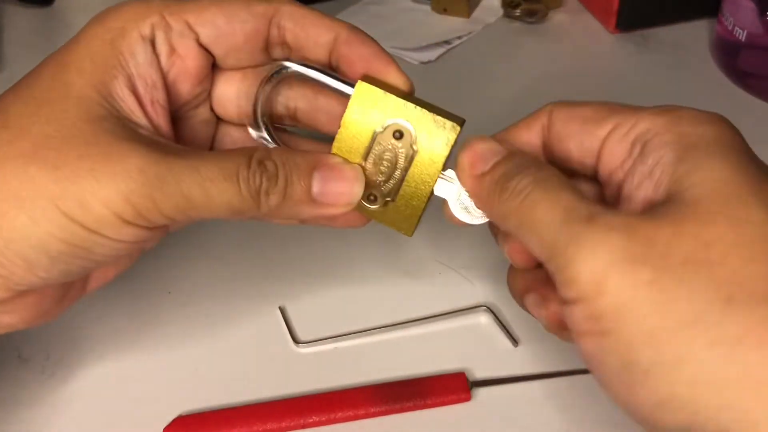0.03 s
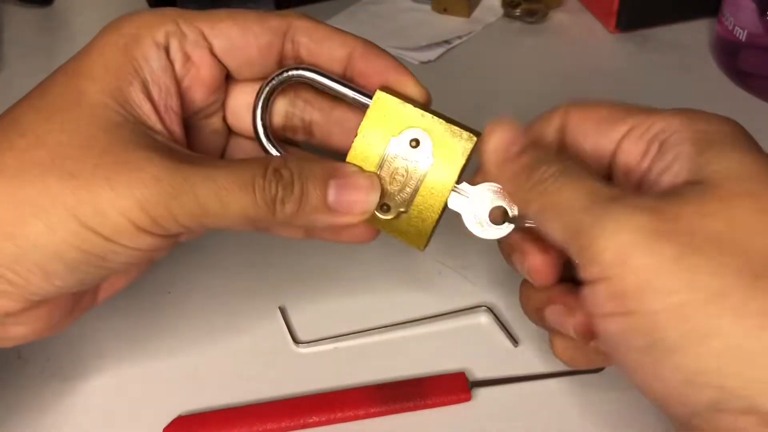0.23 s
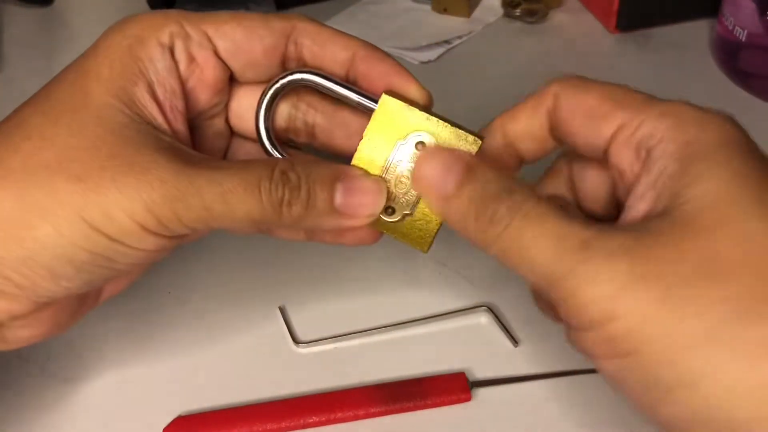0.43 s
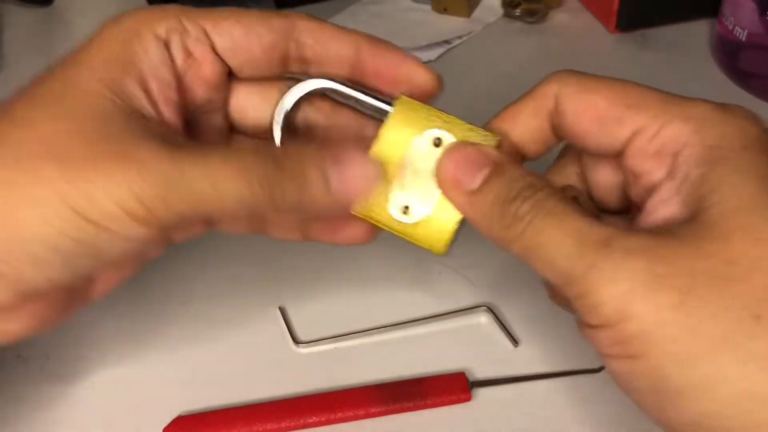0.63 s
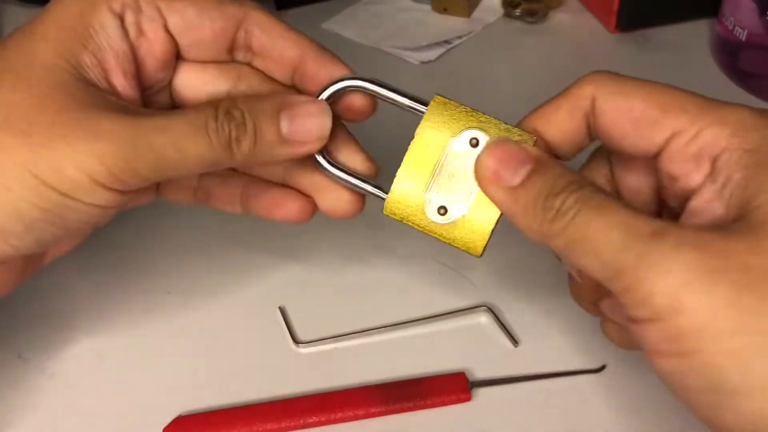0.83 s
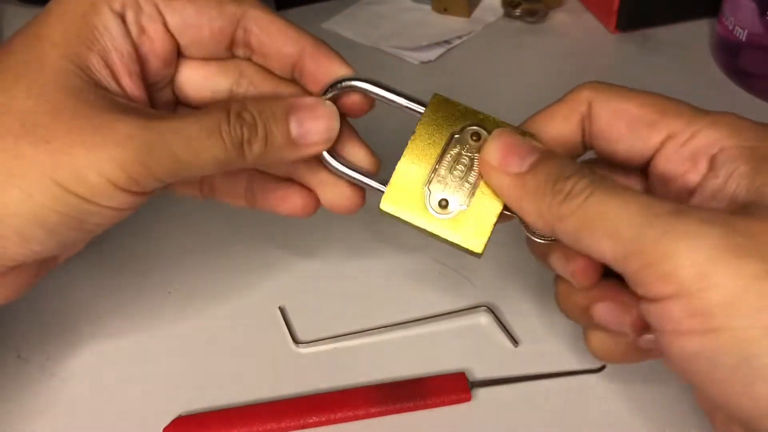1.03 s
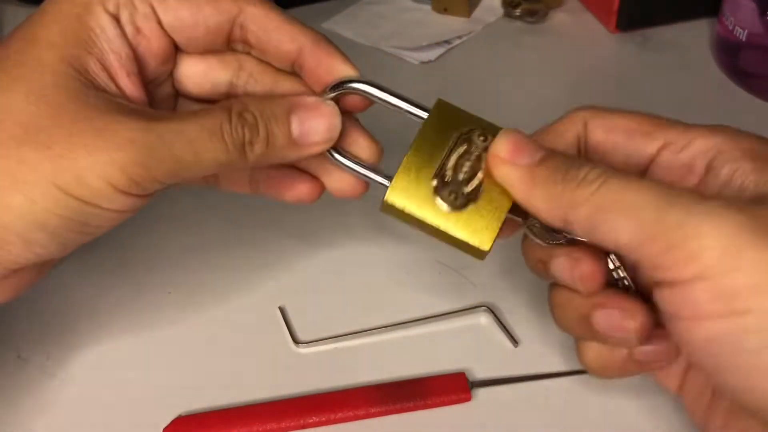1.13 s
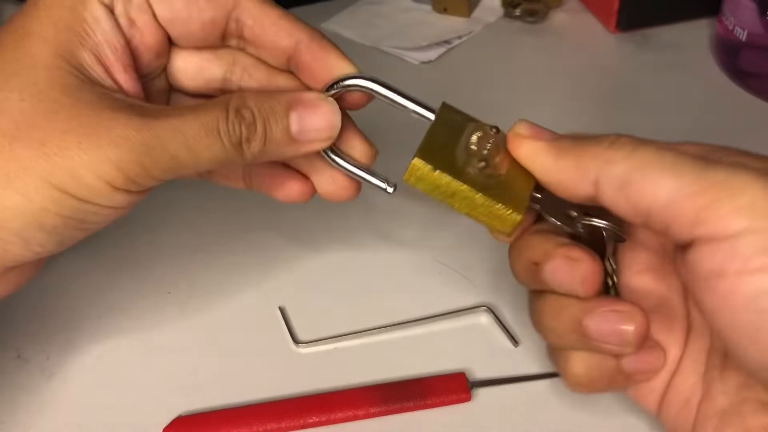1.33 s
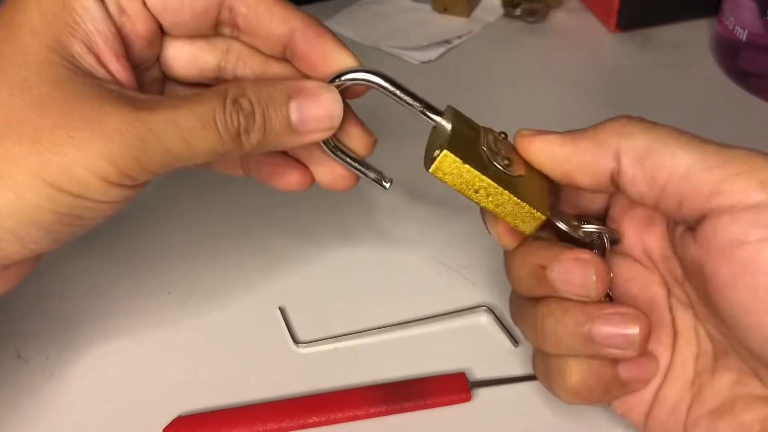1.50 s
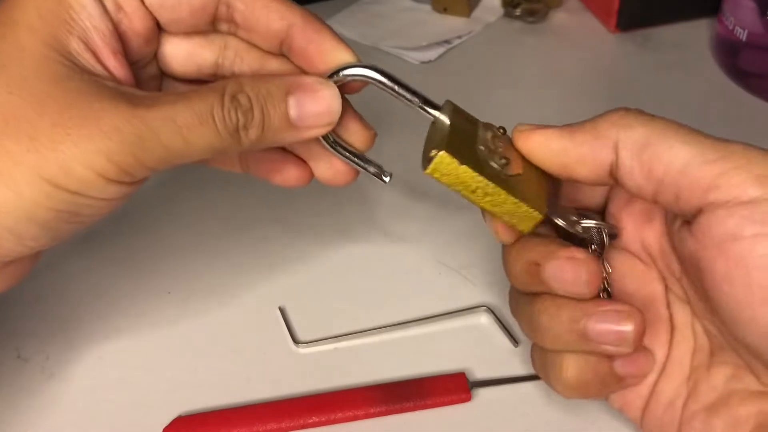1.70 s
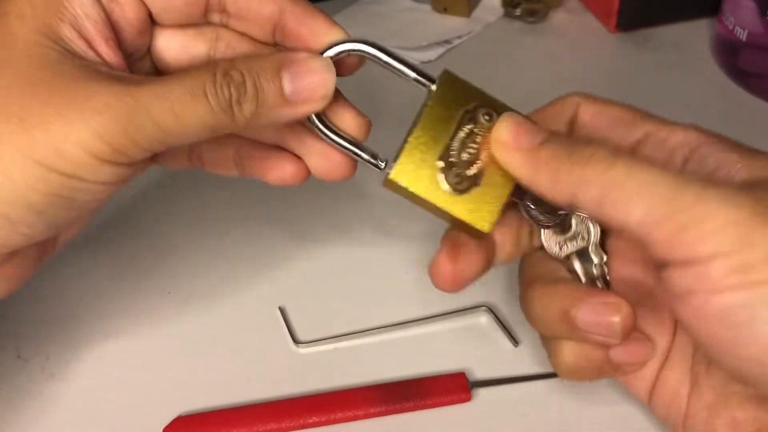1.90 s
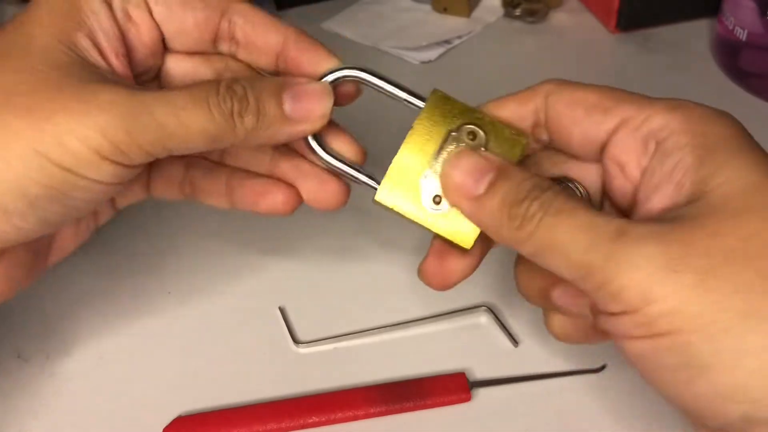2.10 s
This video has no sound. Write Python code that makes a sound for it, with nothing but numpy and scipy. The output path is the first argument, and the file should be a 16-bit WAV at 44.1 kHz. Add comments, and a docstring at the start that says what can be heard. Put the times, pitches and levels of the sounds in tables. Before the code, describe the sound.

A small padlock snaps sharply at 0.06 seconds, a very bright, dense metallic crack with a short diffuse echo. Light ticks and a faint scrape follow at 0.26, then near quiet until a crisp click at 1.0 and a smaller one at 1.2. A soft low bump comes at 1.36. From 1.76 to 2.1, delicate key ticks and scrapes cluster. Low ventilation rumble and faint hiss run throughout.

```python
"""A small brass padlock and its key, worked by hand close to a phone in a quiet room.
The latch snaps home in a rattle of hard blows; key and shackle tick and scrape before and after it.
Contacts crack and ring the metal's modes, and grains of friction drive the same modes in scrapes.
The room answers with a short diffuse echo, over ventilation rumble, low resonances, hiss, a faint
whine and one soft bump. The phone's limiter ducks everything during the snap."""
import sys
import numpy as np
from scipy import signal
from scipy.fft import rfft, irfft
from scipy.io import wavfile
from scipy.ndimage import uniform_filter1d, minimum_filter1d

SR = 44100
rng = np.random.default_rng(int(sys.argv[2]) if len(sys.argv) > 2 else 0)


def gain_from_db(level_db):
    """Convert decibel levels to linear amplitude factors (20 dB per decade)."""
    decades = np.asarray(level_db, float) / 20
    return 10 ** decades


def dump_mix(stems):
    """Bounce the given channels to the path in sys.argv[1] as a 16-bit WAV at rate SR."""
    frames = np.atleast_2d(stems).T  # one column per channel
    limited = np.clip(frames, -1, 1)  # hard clip at full scale
    pcm = np.round(limited * 32767).astype(np.int16)
    wavfile.write(sys.argv[1], SR, pcm)


N = 94815  # samples

# modes of the hand-held lock and key: f/Hz, relative level/dB, t60/s
LOCK = [(2334.4, -5.5, 0.01), (3000, -1, 0.016), (3463, 5.5, 0.011), (4300, 5, .012), (4760, -3, 0.014),
        (4920, 0, 0.011), (5780, 2, 0.01), (6100, -1, .007), (6750, -4.5, 0.009), (7550, -3, 0.007),
        (8420, -3, 0.0067), (9060, -1.5, 0.012), (9718, -5, 0.00792), (10400, -5.5, .008),
        (11220, -2, 0.00767), (12250, -6, 0.013), (12800, 4.5, 0.01), (12830, -26, .06), (13800, -6, .009),
        (15070, -2, .009), (15590, -2, 0.011053)]


def shaped(gain):
    """Noise of rms 1 with gain(Hz) as its amplitude spectrum."""
    spectrum = rfft(rng.standard_normal(N)) * gain(np.fft.rfftfreq(N, 1 / SR) + 1)
    x = irfft(spectrum, N)
    return x / x.std()


def walk(rate):
    """Slow random curve about zero, spread near 1, from `rate` random values a second."""
    k = int(SR / rate)
    steps = np.repeat(rng.standard_normal(N // k + 1), k)
    return 1.3 * uniform_filter1d(uniform_filter1d(steps, k), k)[:N]


def air():
    """Ventilation rumble, wavering low resonances of the room air, microphone hiss, a faint high whine."""
    # spectrum of the rumble: f/Hz, relative level/dB
    rumble_spectrum = [(15, -60), (25, -43), (39, -30.5), (53, -1), (84, -14), (120, -2), (180, 4.5),
                       (242, -6), (277, -0.5), (545, -12), (591, -10), (754, -11), (1160, -13), (1370, -14),
                       (4740, -34.5), (16000, -61)]
    # resonances of the room air: f/Hz, full width at half amplitude/Hz, rms level before waver/dB
    resonances = [(58.5, 17, -72), (138, 21.4, -62), (203.4, 31, -68), (299, 12.92, -67),
                  (396.36, 11, -65.5), (601.3, 11, -63.5), (1053, 190, -65.5)]
    rumble_db, waver_db, hiss_db = -47, 0.6, -76.5
    whine_hz, whine_db, whine_waver_db = 14560, -87, 1.5

    hz, db = np.array(rumble_spectrum).T
    out = gain_from_db(rumble_db) * shaped(lambda f: gain_from_db(np.interp(np.log(f), np.log(hz), db)))
    for centre, width, level_db in resonances:
        level = gain_from_db(level_db + waver_db * walk(5.22))
        out = out + level * shaped(lambda f: 1 / (1 + (2 * (f - centre) / width) ** 2))
    hiss = gain_from_db(hiss_db) * rng.standard_normal(N)
    whine = np.sin(2 * np.pi * whine_hz * np.arange(N) / SR)
    return out + hiss + gain_from_db(whine_db + whine_waver_db * walk(38.3)) * whine


def reach(hz, centre_hz, octaves):
    """How strongly a contact bright at centre_hz stirs each pitch: a bell curve in octaves."""
    return np.exp(-.5 * (np.log2(hz / centre_hz) / np.clip(octaves, .08, 3)) ** 2)


def contacts(rows, modes, spike=0):
    """Each contact cracks and rings the modes near its brightest pitch, at random strengths."""
    scatter_db, detune = 2, 0.9  # spread of mode level; spread of pitch in Hz x t60
    crack_level, crack_s = 0.5, 0.001  # starting rms beside the ring; decay
    rise_s = 0.00013
    length = 9000  # samples
    t = np.arange(length) / SR
    hz, db, t60 = np.array(modes).T
    out = np.zeros(N + length)
    chance = rng.standard_normal((len(rows), 3, 256))
    for (s, peak_db, centre_hz, octaves), (a, b, c) in zip(rows, chance):
        strength = gain_from_db(db + scatter_db * a[:len(hz)]) * reach(hz, centre_hz, octaves)
        pitch = hz + detune * b[:len(hz)] / t60  # short modes scatter most
        rings = np.sin(2 * np.pi * pitch[:, None] * t) * 1000. ** (-t / t60[:, None])
        y = strength @ rings / np.sqrt(np.sum(strength ** 2))

        colour = reach(np.fft.rfftfreq(len(c), 1 / SR) + 1, centre_hz, octaves)
        crack = irfft(rfft(c) * colour)
        y[:len(c)] += crack_level * crack / crack.std() * np.exp(-t[:len(c)] / crack_s)
        click = np.roll(irfft(colour), 8)  # moved clear of the rise
        y[:32] -= spike * click[:32] / click.max()

        y = y * np.minimum(1, t / rise_s)
        out[int(s * SR):][:length] += gain_from_db(peak_db) * y / np.abs(y).max()
    return out[:N]


def friction(rows, modes):
    """Uneven grains of friction drive the modes while metal slides, swelling and fading each time."""
    grain_db, spread_octaves = 2, 1  # unevenness of the grains; reach of each slide
    out = np.zeros(N)
    grains = rng.standard_normal(N) * gain_from_db(grain_db * walk(400))
    rings = []
    for f, db, t60 in modes:
        resonator = signal.iirpeak(f, f * t60 / 4, SR)  # bandwidth 4 / t60
        rings.append((f, gain_from_db(db) * signal.lfilter(*resonator, grains)))
    for s, length, db, centre_hz in rows:
        a, b = int(s * SR), int((s + length) * SR)
        y = sum(reach(f, centre_hz, spread_octaves) * ring[a:b] for f, ring in rings)
        swell = np.sqrt(np.sin(np.pi * np.arange(b - a) / (b - a)))
        out[a:b] += gain_from_db(db) * swell * y / y.std()
    return out


def lock_ticks():
    """Light contacts of key, latch and shackle ring the hand-held lock."""
    # contacts, before low cut and limiter: t/s, peak level/dB, brightest f/Hz, spread/octaves
    tick_rows = [(0.0411, -56, 10400, 0.52), (0.0434, -43, 11100, 0.62), (0.0461, -53, 10300, 0.6),
                 (0.0494, -58, 11600, 0.55), (0.055, -40.5, 7990, 0.59), (0.2574, -50, 8200, 0.65),
                 (0.2624, -43, 9200, 0.83), (0.2651, -31.5, 14600, 0.27), (0.2652, -38, 8000, 0.45),
                 (0.2667, -41.5, 13600, 0.59), (0.3076, -55, 12800, 0.18), (0.4187, -57, 8600, 0.59),
                 (0.5153, -62, 6980, 0.417), (0.9947, -28, 5590, 0.17), (0.9947, -32, 3330, 0.17),
                 (0.9954, -27, 8900, 0.067), (0.9957, -35, 11100, 0.11), (0.9984, -39, 5170, 0.21),
                 (0.9987, -40.5, 3200, 0.25), (1.0012, -40, 9350, 0.5), (1.0125, -61, 3000, 0.226),
                 (1.0072, -57, 5340, 0.13), (1.0077, -53, 7500, 0.12), (1.0074, -53, 12500, 0.14),
                 (1.0435, -65, 7990, 0.5), (1.1088, -50, 5560, 0.11), (1.1103, -54, 9000, 0.1),
                 (1.2089, -36, 12600, 0.18), (1.209, -46, 8480, 0.425), (1.2092, -48.5, 4876, 0.16),
                 (1.2596, -60, 10060, 0.64), (1.2827, -63, 8800, 0.56), (1.2908, -60, 10950, 0.477),
                 (1.7594, -42, 14200, 0.2), (1.765, -45.5, 6580, 0.13), (1.7663, -45.5, 13300, 0.18),
                 (1.7748, -48, 12800, 0.13), (1.7765, -48.5, 8900, 0.15), (1.7839, -50, 15130, 0.15),
                 (1.8049, -58, 11600, 0.5), (1.8259, -39.5, 12800, 0.095), (1.825, -45, 8600, 0.2),
                 (1.8262, -57.5, 4300, 0.1), (1.8319, -51, 12800, 0.15), (1.832, -55, 8700, 0.15),
                 (1.8551, -45.5, 13300, 0.2), (1.8556, -51.5, 4350, 0.1), (1.856, -50, 9200, 0.16),
                 (1.8696, -52, 8900, 0.16), (1.9245, -58.5, 12800, 0.15), (1.9578, -36, 13050, 0.18),
                 (1.958, -43.5, 4190, 0.11), (1.9602, -36, 8800, 0.22), (1.9644, -35, 8300, 0.19),
                 (1.9646, -37, 12800, 0.16), (1.9853, -61, 9700, 0.5), (1.9932, -60, 9500, 0.52),
                 (2.0111, -56, 9700, 0.42), (2.0149, -42, 12790, 0.22), (2.0152, -40, 8000, 0.134),
                 (2.0297, -46, 8500, 0.18), (2.0387, -54, 10650, 0.18), (2.0498, -46.5, 9900, 0.5),
                 (2.0516, -58, 15280, 0.13), (2.08, -55.5, 9200, 0.61)]
    return contacts(tick_rows, LOCK)


def latch_snap():
    """The latch snaps home: hard blows, each with a sharp first spike, ring the bolt as it slides."""
    # blows, before low cut and limiter: t/s, peak level/dB, brightest f/Hz, spread/octaves
    blows = [(.0599, -16, 8480, 0.69), (.062, -16, 10600, 0.39), (.0630, -11.5, 12000, .4),
             (.0637, -8.5, 13800, 0.23), (.0644, -7, 12100, 0.29), (.0653, -8.5, 11300, 0.35),
             (.0661, 1.5, 11000, 0.77), (.0664, -16.5, 2150, .3), (.0666, 6.5, 11000, 0.84),
             (.068, -6.5, 11800, 0.54), (.0691, -5, 11800, .4), (.0692, -4.5, 6150, .4),
             (.0703, -7, 13920, 0.44), (.072, -21.5, 8000, .5), (.0797, -40, 6150, 0.17)]
    # modes of the latch bolt and shackle: f/Hz, relative level/dB, t60/s
    latch_modes = [(1980, -5, .014), (2600, -10, .012), (3440, -9, .012), (3720, -29, .13),
                   (4030, -11, .01), (4700, -10, .006), (5400, -7, .007), (5800, -5, .011),
                   (6260, -5, .011), (6880, -6, .008), (7260, -6, .011), (7620, -7, .012), (8770, -2, .012),
                   (9700, -8, .007), (10300, -5, .008), (10900, 1, .009), (11250, 0, .009),
                   (11750, 2, .007), (12130, 4, .011), (12075, -31, .16), (12900, -1, .007),
                   (14100, -3, .007), (14700, -1, .008), (15550, -8, .009)]
    # the sliding bolt: start t/s, length/s, rms level before swell, low cut and limiter/dB, brightest f/Hz
    bolt_slide = [(0.0612, 0.017, -15.5, 11450)]
    spike_db = 7.5  # over the ring
    return contacts(blows, latch_modes, gain_from_db(spike_db)) + friction(bolt_slide, latch_modes)


def room(x):
    """Diffuse echo: bands of decaying noise after a first return, dying sooner in the treble."""
    room_db, return_s, build_s = -18, 0.0066, 0.00073
    t60_low_s, t60_high_s = 0.39, 0.15  # at 3 and 15 kHz
    t = np.arange(SR // 2) / SR
    tail = 0
    for lo in 2600 * 2 ** np.arange(0, 2.6, .5):  # half-octave bands, lower edge in Hz
        t60 = np.interp(np.log(lo), np.log([3000, 15000]), [t60_low_s, t60_high_s])
        band = signal.butter(2, [lo, lo * 2 ** .5], "band", fs=SR, output="sos")
        noise = signal.sosfilt(band, rng.standard_normal(len(t)))
        tail = tail + noise * 1000. ** (-t / t60)
    tail = tail * np.clip((t - return_s) / build_s, 0, 1)
    return gain_from_db(room_db) * signal.fftconvolve(x, tail / np.sqrt(np.sum(tail ** 2)))[:N]


def lock_scrapes():
    """Metal slides on metal and stirs the modes of the hand-held lock."""
    # slides: start t/s, length/s, rms level before swell and low cut/dB, brightest f/Hz
    slides = [(0.251, 0.069, -65, 12760), (0.596, 0.097, -74, 9030), (1.25, 0.048, -74, 10900),
              (1.762, 0.029, -61.5, 11000), (1.852, .03, -66, 10000), (1.929, 0.028, -61.5, 13200),
              (1.982, 0.08, -65.5, 10000)]
    return friction(slides, LOCK)


def bump():
    """One soft low bump: a dull cosine under a bell-shaped envelope."""
    centre_s, peak_db, hz, spread_s = 1.364, -39, 138.7, 0.0033
    t = np.arange(N) / SR - centre_s
    return -gain_from_db(peak_db) * np.cos(2 * np.pi * hz * t) * np.exp(-.5 * (t / spread_s) ** 2)


def scene():
    """The small lock radiates little bass; its echo, the bump and the room air join it."""
    low_cut = signal.butter(4, 1550, "high", fs=SR, output="sos")  # Hz
    lock = signal.sosfilt(low_cut, lock_ticks() + latch_snap() + lock_scrapes())
    return (lock + room(lock) + bump() + air())[None]


def low_pass(x):
    """Removes everything above the highest recorded frequency."""
    return signal.sosfilt(signal.butter(12, 16630, fs=SR, output="sos"), x)


def record(dry):
    """The phone's limiter eases the gain down around peaks and holds it; the top band is dimmed."""
    ceiling_db, ratio = -12, 2.132
    lag_s, hold_s, ease_s = 0.0015, 0.0037, 0.0063
    top_hz, top_db = 15560, -30  # reached 200 Hz higher

    want = np.minimum(1, (gain_from_db(ceiling_db) / (np.abs(dry) + 1e-9)) ** (1 - 1 / ratio))
    hold, lag, ease = int(hold_s * SR), int(lag_s * SR), int(ease_s * SR) + 1
    held = minimum_filter1d(want, hold + ease)
    gain = np.roll(uniform_filter1d(held, ease), (hold + ease) // 2 + lag, axis=1)

    f = np.fft.rfftfreq(N, 1 / SR)
    dimming = gain_from_db(top_db * np.clip((f - top_hz) / 200, 0, 1))
    mix = irfft(rfft(dry * gain) * dimming, N)
    return low_pass(mix)


dry = scene()
out = record(dry)
dump_mix(out)
```